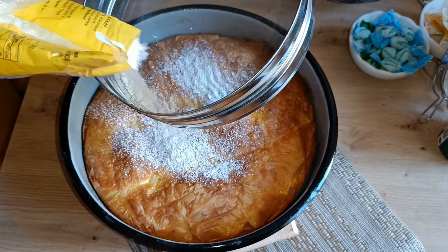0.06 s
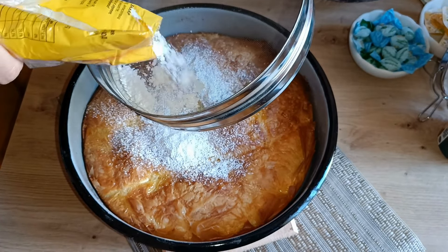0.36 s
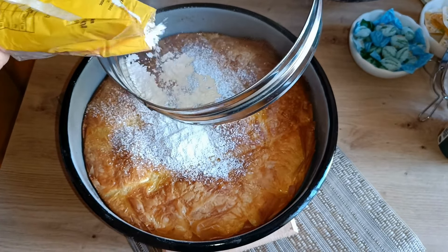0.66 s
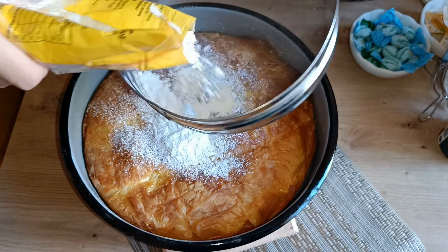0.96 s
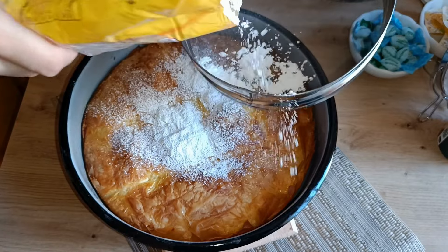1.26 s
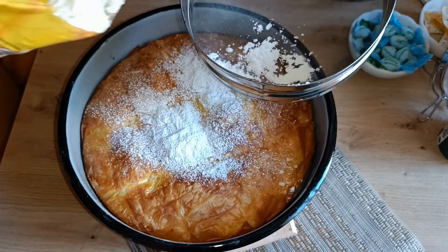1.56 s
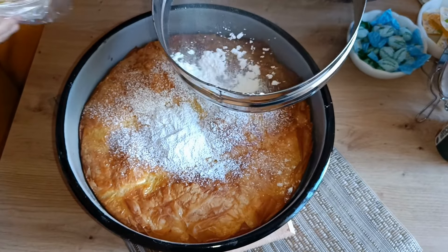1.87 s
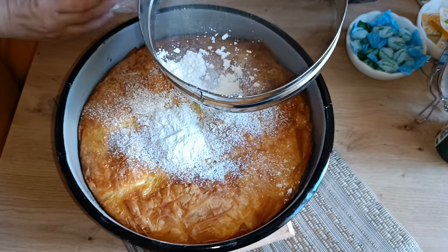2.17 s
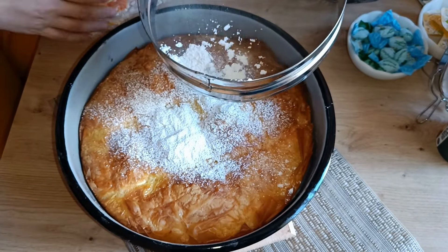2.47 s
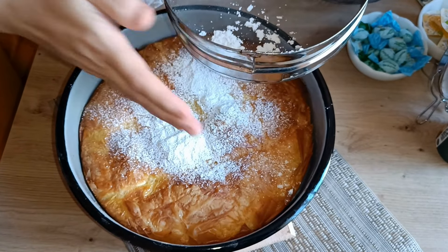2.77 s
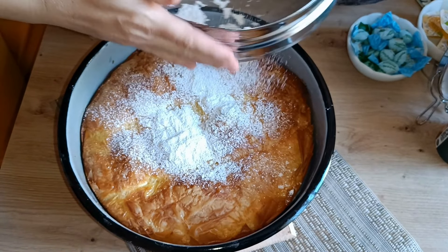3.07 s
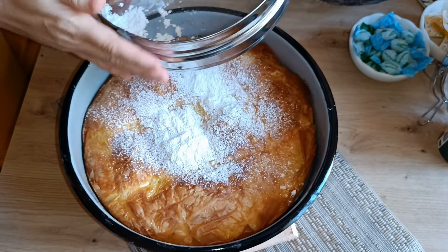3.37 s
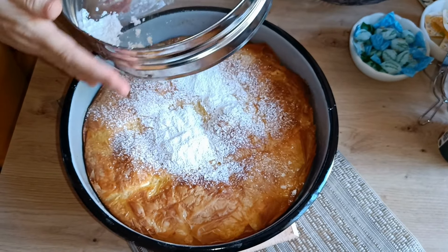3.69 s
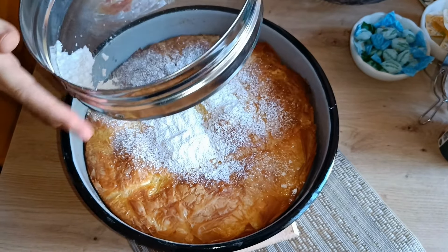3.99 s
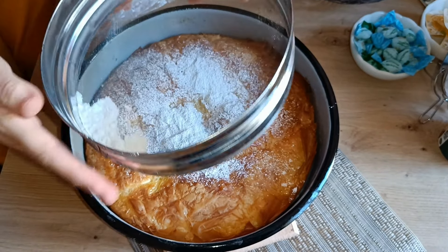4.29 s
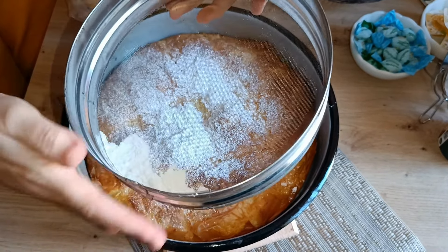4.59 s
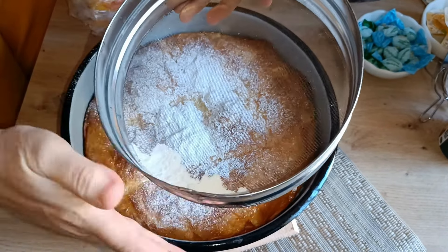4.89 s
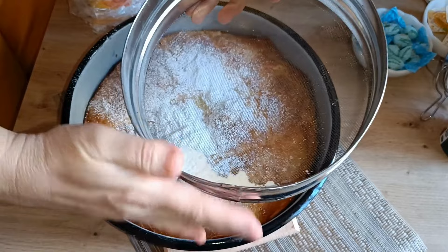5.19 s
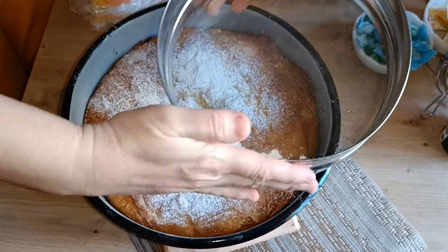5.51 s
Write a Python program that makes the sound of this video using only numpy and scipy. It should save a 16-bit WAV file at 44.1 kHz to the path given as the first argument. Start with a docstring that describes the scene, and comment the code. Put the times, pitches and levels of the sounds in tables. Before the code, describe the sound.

For the first second and a half, powdered sugar slides from a paper bag into a sieve in faint, hissing spurts, with a sharp paper tick and small pops near 0.3 seconds. From about 1.7 seconds the bag rustles softly, and its creases snap around 2.1 seconds. At 2.4 seconds it is set down on a wooden table with a soft thud and a louder cluster of crackles, ending with a small pop near 2.8 seconds.

From 3 seconds to the end, at about 5.6 seconds, a hand pats the rim of the steel sieve roughly six times a second. Each pat gives a short, bright rattle of mesh against a ringing hoop, a light low thump and a fine fizz of sugar. The pats vary in strength and are somewhat firmer in the last second. Everything sounds close, in a small, quiet kitchen with little echo.

```python
"""A hand pats a steel sieve of powdered sugar about six times a second, in a small, quiet kitchen.
Each pat thumps the taut mesh, rattles it in its ringing hoop and makes the sugar fizz on the wires.
Before the pats, the sugar slides into the sieve from a paper bag,
which crackles and is set down on a wooden table."""
import sys
import numpy as np
from scipy import signal
from scipy.fft import rfft, irfft
from scipy.io import wavfile

SR = 44100
rng = np.random.default_rng(int(sys.argv[2]) if len(sys.argv) > 2 else 0)


def digitize_waveform(pressure):
    """Quantize a signal to 16-bit integers and store it at the path in sys.argv[1].

    Rows of a 2-D input are taken as channels; values are limited to [-1, 1].
    """
    field = np.atleast_2d(pressure).T
    bounded = np.clip(field, -1, 1)
    quanta = np.round(bounded * 32767).astype(np.int16)
    wavfile.write(sys.argv[1], SR, quanta)


N = 249165
TIME = np.arange(N) / SR
LEAD_IN = SR // 10  # samples ahead of an event's peak
EVENT_S = TIME[:SR // 2] - LEAD_IN / SR

# Kitchen reverberation. Each row: frequency in Hz, t60 in seconds.
KITCHEN_T60 = [(100, 0.25), (400, 0.18), (1500, 0.15), (4000, 0.21), (7000, 0.2), (11000, 0.13),
               (16000, 0.14)]
# Colour of the two microphone ports. Each row: frequency in Hz, left minus right in dB.
PORT_BALANCE = [(100, 1), (380, -2.5), (700, 0.5), (1300, 1.5), (2300, 5), (3200, -5.5), (4400, -11.5),
                (6000, -8.5), (7300, -0.5), (10000, 5.5), (13000, 4), (15500, -3)]
# Spectra. Each row: frequency in Hz, relative density in dB.
ROOM_SPECTRUM = [(15, -25), (25, 4.5), (70, 3.5), (149, 4), (516, -5.5), (936, -8.5), (2110, -13.5),
                 (3160, -17.5), (6740, -18), (9570, -22.5), (14000, -17.5), (16000, -17.5)]
SUGAR_SPECTRUM = [(300, -9.5), (1000, -8), (1600, -2), (2200, 5.5), (3000, -1), (4200, 0.5), (5200, -6),
                  (6900, 4.5), (8300, -6.5), (12000, -10)]  # sliding powder, rustle, crinkles
FIZZ_SPECTRUM = [(3000, -19), (6500, 6.5), (8700, 1.5), (10000, -1), (12000, 0), (14000, 1.5),
                 (16000, -0.5)]  # fine hiss of sugar and paper
TICK_SPECTRUM = [(80, -7), (350, -10.5), (1000, -4), (2600, 13), (4300, -1), (6800, 4), (9500, -14),
                 (16000, -6)]  # stiff crease, sugar lump
CRUMPLE_SPECTRUM = [(150, -14), (500, -3.5), (800, -5.5), (1300, 3), (2200, 5), (3000, -3), (4000, 1.5),
                    (5100, -9.5), (6500, -2.5), (8200, -16.5), (11000, -61), (16000, -49)]
THUD_SPECTRUM = [(30, -34), (70, -7), (130, -2.5), (300, 11), (450, 4.5), (750, 9), (1500, -17)]  # table thud, dull knock
PALM_SPECTRUM = [(30, -9), (70, 1.5), (130, 0), (200, 0), (280, -10), (450, -11.5), (750, -19), (1500, -21)]
CLACK_SPECTRUM = [(200, -21.5), (600, -19.5), (900, -22), (1400, 0.5), (2100, -6), (3000, 0.5), (6000, -7),
                  (10000, -53)]  # sieve rim
RATTLE_SPECTRUM = [(600, -33.5), (1500, -12.5), (2400, 1), (3400, 2), (4200, 1), (5000, -6), (6300, 2.5),
                   (7300, 2.5), (8200, -8.5), (10000, -17), (16000, -68.5)]  # mesh against hoop
# Modes of table top, mesh and hoop. Each row: frequency in Hz, relative level in dB, t60 in seconds.
TABLE_MODES = [(120, -3, 0.35), (163.8, 0.5, 0.54), (277, -22, 0.16), (332, -7, 0.17), (404.5, -0.5, 0.45)]
MESH_MODES = [(155.8, -29, 1), (269, -12, 0.14), (325.3, 10, 0.066), (395, -23, 0.42), (534, -11.5, 0.117)]
HOOP_MODES = [(1414, -4, .06), (2380, -10, .05), (2680, -59, 0.15), (3240, -20, 0.063), (3560, 14, 0.12),
              (3684, 14.5, 0.035), (4200, 13.5, 0.031), (4260, 5, 0.036), (4170, 14, 0.11),
              (5020, 17, 0.038), (6200, -16, .04), (6790, -24, .06), (7960, -33, .055)]
# Powder leaving the bag. Each row: time in seconds, level in dB, hiss offset in dB.
SUGAR_SPURTS = [(.135, -54, -1), (0.234, -52, 2.5), (0.332, -61.5, 13.5), (0.373, -51, 4),
                (0.553, -64, 15.5), (0.653, -74, 11), (0.813, -71, 12), (0.935, -50, -15),
                (1.164, -71.5, 9.5), (1.466, -69.5, 6.5)]
# Sharp ticks: paper creases snapping and, at 1.3 s, a sugar lump dropping with a brief hiss.
# Each row: time in seconds, level in dB, hiss offset in dB, reverb gain in dB.
SHARP_TICKS = [(0.244, -37.5, -38, -8), (1.301, -69, 10, 0), (1.882, -51, -22, -1), (2.066, -43, -4, 0),
               (2.104, -27, -8.5, -1), (2.117, -35.5, -14, -4.5), (2.54, -30, -27, -2.5),
               (2.63, -40.5, -17, 6.5)]
# Wide folds buckling. Each row: time in seconds, level in dB, centre in Hz, decay in seconds.
FOLD_POPS = [(0.1258, -47, 2160, 0.00095), (0.279, -39, 1382, 0.0016), (0.482, -56, 2070, 0.0038),
             (1.304, -62, 1810, 0.0055), (2.258, -46.5, 1420, 0.0031), (2.787, -37.5, 2020, 0.0029)]
# The bag crumpling. Each row: time in seconds, level in dB, hiss offset in dB, decay in seconds.
BAG_CRUMPLES = [(2.124, -45, 1, 0.075), (2.398, -30.5, -5.5, 0.034), (2.435, -30.5, -6, 0.039),
                (2.512, -30.5, -19, 0.019), (2.553, -27.5, -13.5, 0.023), (2.644, -29, -16, 0.024)]
# Pats on the rim. Each row: time in seconds, base level in dB, clack offset in dB, fizz offset in dB,
# rise in seconds (slower for a flatter hand).
RIM_PATS = [(3.024, -29, -7.5, -28, 0.00055), (3.073, -36, -8, -17.5, 0.0037),
            (3.2442, -47, -35, -21, 0.0026), (3.3974, -41.5, -13.5, -21, .0008),
            (3.5505, -37.5, -7.5, -9, 0.001), (3.7018, -32.5, -9, -18.5, 0.0016),
            (3.8519, -37, -3, -16.5, 0.00076), (4.009, -30.5, -10, -10, 0.0014),
            (4.1628, -35, -16, -9.5, 0.0048), (4.3251, -42.5, -22, -14.5, 0.0039),
            (4.4676, -28, -24.5, -17.5, 0.0018), (4.62, -32, -14, -21, 0.00067),
            (4.6689, -39.5, -25, -20, 0.002), (4.7698, -36.5, -9.5, -17, 0.005),
            (4.9318, -25.5, -15, -15, 0.00066), (5.1081, -28, -12, -11.5, 0.0024),
            (5.2837, -30.5, -4, -13, 0.0011), (5.47, -26, -16.5, -17, 0.002),
            (5.6444, -59.5, -9, -11, 0.0012)]
# The sieve moving from the far side to the middle of a cake. Each row: time in seconds,
# left lead in ms, hoop offset in dB, mesh offset in dB (both from the pat's base level).
SIEVE_PATH = [(3.0, .19, -10, -41), (3.8, .22, -19.5, -31), (4.02, 0.059, -19.5, -14.5),
              (4.5, 0.078, -36, -22.5), (4.95, 0.085, -17, -14.5), (5.5, 0.11, -18, -15)]


def undb(db):
    """Decibels to gain."""
    return 10 ** (np.asarray(db) / 20)


def at_hz(points, hz):
    """Read (Hz, value) points on a log-frequency axis."""
    f, value = np.transpose(points)
    return np.interp(np.log(np.maximum(hz, 1)), np.log(f), value)


def through(x, impulse):
    """Convolve with an impulse response scaled to unit energy."""
    return signal.fftconvolve(x, impulse / np.linalg.norm(impulse))[:len(x)]


def colour(x, spectrum, size=2048):
    """Minimum-phase filter; white input keeps its power."""
    cepstrum = irfft(np.log(undb(at_hz(spectrum, np.fft.rfftfreq(size, 1 / SR)))))
    cepstrum[1:size // 2] *= 2
    cepstrum[size // 2 + 1:] = 0
    return through(x, irfft(np.exp(rfft(cepstrum))))


def ring(x, modes):
    """Drive decaying modes; white input keeps its power."""
    t = TIME[:len(EVENT_S)]
    impulse = sum(undb(db - 60 * t / t60) * np.sin(2 * np.pi * hz * t) for hz, db, t60 in modes)
    return through(x, impulse)


def grit(spread_db, count, size=16):
    """Tiny contacts of unequal strength, size samples each; rms 1."""
    strength = undb(spread_db * np.minimum(rng.exponential(size=count // size + 1), 2 * np.pi))
    contacts = rng.standard_normal(count) * np.repeat(strength, size)[:count]
    return contacts / np.sqrt(np.mean(contacts ** 2))


def burst(db, rise_s, decay_s, spread_db=0):
    """A swelling, dying cluster of contacts; db is its energy spread over 4 ms."""
    tau_s = np.maximum(np.where(EVENT_S < 0, rise_s, decay_s), 0.1 / SR)
    cluster = grit(spread_db, len(EVENT_S)) * np.exp(-np.abs(EVENT_S) / tau_s)
    return cluster * undb(db) * np.sqrt(0.004 * SR / np.sum(cluster ** 2))


def add(out, at_s, sound):
    """Mix in an event with its zero moment at at_s."""
    start = int(at_s * SR) - LEAD_IN
    first, last = max(start, 0), min(start + sound.shape[1], N)
    out[:, first:last] += sound[:, first - start:last - start]


def port_noise(alike_hz, size, likeness=0.83):
    """Diffuse noise at two ports: alike in the bass, unrelated in the treble."""
    mid, side = rfft(rng.standard_normal((2, size)))
    alike = likeness / (1 + (np.fft.rfftfreq(size, 1 / SR) / alike_hz) ** 4)
    mid, side = mid * np.sqrt((1 + alike) / 2), side * np.sqrt((1 - alike) / 2)
    return irfft([mid + side, mid - side], size)


def kitchen(dry, lead_ms, wet_db, build_s, size=9216):
    """Direct sound reaches the left port first; table, tiles and cupboards add a short tail."""
    hz, t, cells = signal.stft(port_noise(650, size), SR, nperseg=256)
    fading = undb(-60 * t / at_hz(KITCHEN_T60, hz)[:, None])
    build_up = 1 - np.exp(-TIME[:size] / build_s)
    tails = signal.istft(cells * fading, SR)[1][:, :size] * build_up
    wet = np.array([through(dry, tail) for tail in tails])
    hz = np.fft.rfftfreq(len(dry), 1 / SR)
    in_step_above_hz = 6300
    lead_cycles = hz * lead_ms / 1000 / (1 + (hz / in_step_above_hz) ** 16)
    left = irfft(rfft(dry) * np.exp(2j * np.pi * lead_cycles), len(dry))
    return np.array([left, dry]) + undb(wet_db) * wet


def still_air():
    """Faint rumble and hiss of a quiet room."""
    noise = port_noise(630, N, likeness=0.28)
    return undb(-69.5) * np.array([colour(port, ROOM_SPECTRUM) for port in noise])


def sliding_sugar(landing_s):
    """Powder slides over paper and hits the mesh in spurts; the bag rustles as it is drawn away."""
    tip_back_s, fade_db_per_s = 0.91, 51
    draw_s, swell_db_per_s = 1.689, 30
    trickle = undb(-71 - fade_db_per_s * np.maximum(TIME - tip_back_s, 0))
    swell_db = np.minimum(-69.5 + swell_db_per_s * (TIME - draw_s), -56)
    rustle = undb(swell_db) * (TIME > draw_s) * (TIME < landing_s)
    grains = grit(2.2, N, size=48) * trickle + grit(2.8, N, size=48) * rustle  # paper is scratchier
    slide = colour(grains, SUGAR_SPECTRUM) + undb(-22) * colour(grains, FIZZ_SPECTRUM)
    out = kitchen(slide, lead_ms=0.24, wet_db=0.5, build_s=0.00042)
    for at_s, db, hiss_db in SUGAR_SPURTS:
        powder = colour(burst(db, 0.03, 0.039, spread_db=4), SUGAR_SPECTRUM)
        hiss = colour(burst(db + hiss_db, 0.015, 0.024, spread_db=3.5), FIZZ_SPECTRUM)
        add(out, at_s, kitchen(powder + hiss, 0.3, -1.3, 0.00067))
    return out


def ticks_and_pops():
    """Stiff creases snap, a sugar lump drops, small creases crinkle; wide folds buckle and pop."""
    out = np.zeros((2, N))
    for at_s, db, hiss_db, wet_db in SHARP_TICKS:
        tick = colour(burst(db, 0.0003, 0.00058), TICK_SPECTRUM)
        hiss = colour(burst(db + hiss_db, 0.0009, 0.00051), FIZZ_SPECTRUM)
        add(out, at_s + 0.000935, kitchen(tick + hiss, 0.26, wet_db, 0.0035))
    knock = colour(burst(-46.5, 0.00023, 0.00075), THUD_SPECTRUM)
    add(out, 0.244, kitchen(knock, 0.14, -10, 0.0014))  # with the first tick
    for at_s in rng.uniform(0, 3.2, size=20):
        crinkle = colour(burst(rng.normal(-64.5, 1.5), 0.0006, 0.0022), SUGAR_SPECTRUM)
        add(out, at_s, kitchen(crinkle, 0.083, -1, 0.00091))
    for at_s, db, hz, decay_s in FOLD_POPS:
        hollow = [(hz / 8, -26), (hz / 1.25, -8), (hz / 1.78, 0),
                  (hz * 0.88, 0), (hz * 2, -10), (hz * 4, -38)]
        pop = colour(burst(db, 0.00046, decay_s), hollow)
        add(out, at_s + 0.00064, kitchen(pop, 0.14, 0.28, 0.0065))
    return out


def table_top(db, rise_s, decay_s):
    """A soft push makes the wooden table thud and ring."""
    push = burst(db, rise_s, decay_s, spread_db=2.5)
    wood = ring(push, TABLE_MODES) + undb(-6) * colour(push, THUD_SPECTRUM)
    return kitchen(wood, lead_ms=0.22, wet_db=-6.5, build_s=0.0019)


def bag_set_down(landing_s):
    """Paper crumples in dense crackles; the bag's weight and each later crumple push on the table."""
    out = np.zeros((2, N))
    add(out, landing_s, table_top(db=-30.5, rise_s=0.007, decay_s=0.015))
    for at_s, db, hiss_db, decay_s in BAG_CRUMPLES:
        rise_s = 0.6 * decay_s
        paper = colour(burst(db, rise_s, decay_s, spread_db=3.5), CRUMPLE_SPECTRUM)
        hiss = colour(burst(db + hiss_db + 3.5, rise_s, decay_s, spread_db=3), FIZZ_SPECTRUM)
        add(out, at_s, kitchen(paper + hiss, 0.23, 0.31, 0.0018))
        if at_s > landing_s:
            add(out, at_s, table_top(db - 23, 0.31 * rise_s, decay_s))
    return out


def sieve():
    """A pat throws the mesh against its hoop; the hoop rings, the mesh drums and the sugar jumps."""
    firm_pat_db, peak_delay_s = -30, 0.0022  # each pat peaks a moment after its listed time
    path_s, *path_columns = np.transpose(SIEVE_PATH)
    out = np.zeros((2, N))
    for at_s, db, clack_db, fizz_db, rise_s in RIM_PATS:
        lead_ms, hoop_db, mesh_db = (np.interp(at_s, path_s, column) for column in path_columns)
        decay_s = 0.00057 + 0.87 * rise_s
        blow = burst(db - 7, rise_s, decay_s, spread_db=3.5)
        chatter = burst(db - 8.5, rise_s, 0.0054, spread_db=5)
        loose_sugar = burst(db + fizz_db - 7, 0.0066, 0.0073, spread_db=6.5)
        rattle = colour(blow + chatter + loose_sugar, RATTLE_SPECTRUM)
        hoop = ring(burst(db + hoop_db, rise_s, 0.0035), HOOP_MODES)
        clack = colour(burst(db + clack_db, rise_s, 0.0016), CLACK_SPECTRUM)
        spray = burst(db + fizz_db + 2, 0.0022, 0.021, spread_db=-12)
        jump = burst(db + fizz_db + 5.5, rise_s, decay_s, spread_db=3)
        fizz = colour(jump + spray, FIZZ_SPECTRUM)
        drum = ring(burst(db + mesh_db, 0, 0), MESH_MODES)  # one single shove
        thud_db = -54 + 0.33 * (db - firm_pat_db)
        thud = colour(burst(thud_db, 0.00067, 0.012), PALM_SPECTRUM)
        pat = kitchen(rattle + hoop + clack, lead_ms, wet_db=0.62, build_s=0.00087)
        pat += kitchen(fizz, lead_ms, wet_db=-0.26, build_s=0.0031)
        pat += kitchen(drum + thud, lead_ms, wet_db=-0.58, build_s=0.0012)
        add(out, at_s + peak_delay_s, pat)
    return out


def scene():
    """Bag on the left, sieve near the middle."""
    landing_s = 2.398  # the bag meets the table
    return sieve() + sliding_sugar(landing_s) + bag_set_down(landing_s) + ticks_and_pops() + still_air()


def record(dry):
    """Two small microphone ports, each with its own colour; deep bass lost, top cut steeply."""
    low_hz, top_hz = 42, 16000
    balance_db = at_hz(PORT_BALANCE, np.fft.rfftfreq(N, 1 / SR))
    ports = irfft(rfft(dry) * undb(np.array([balance_db, -balance_db]) / 2), N)
    ports = signal.sosfilt(signal.butter(2, low_hz, "highpass", fs=SR, output="sos"), ports)
    return signal.sosfilt(signal.ellip(10, 0.2, 70, top_hz, fs=SR, output="sos"), ports)


dry = scene()
out = record(dry)
digitize_waveform(out)
```